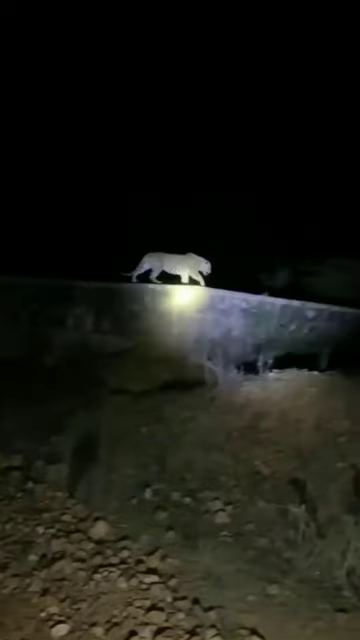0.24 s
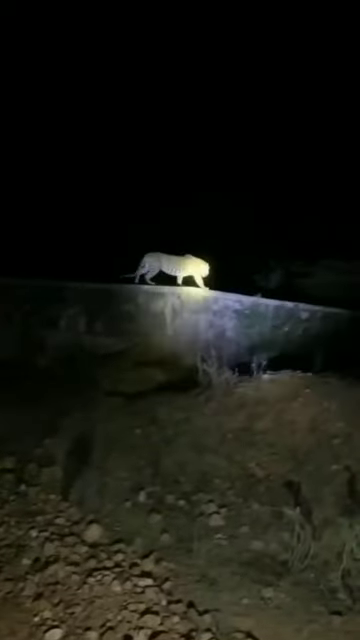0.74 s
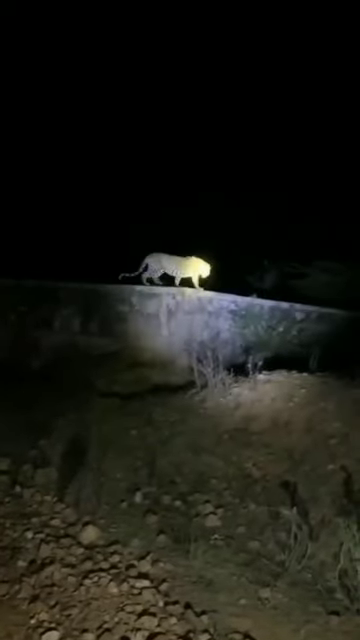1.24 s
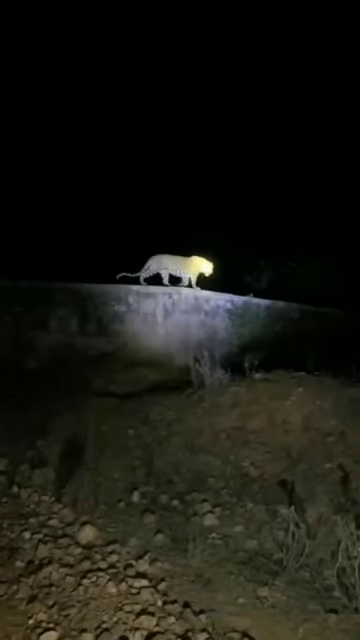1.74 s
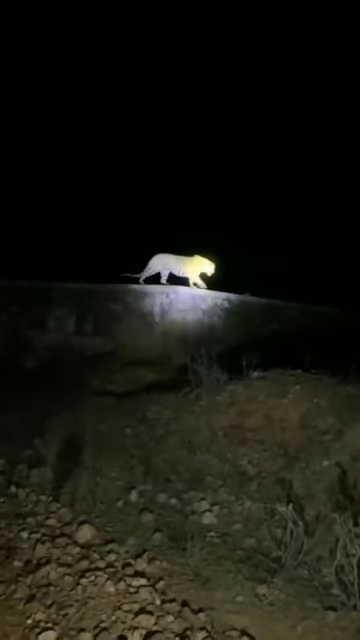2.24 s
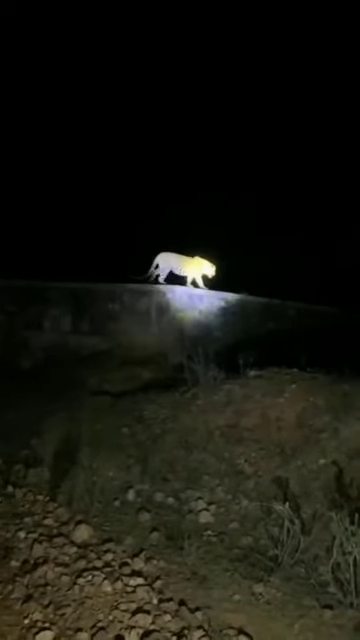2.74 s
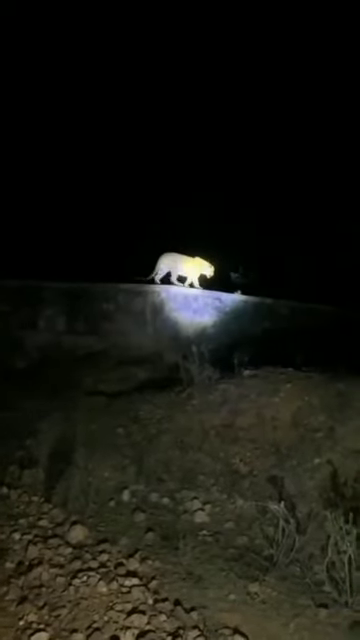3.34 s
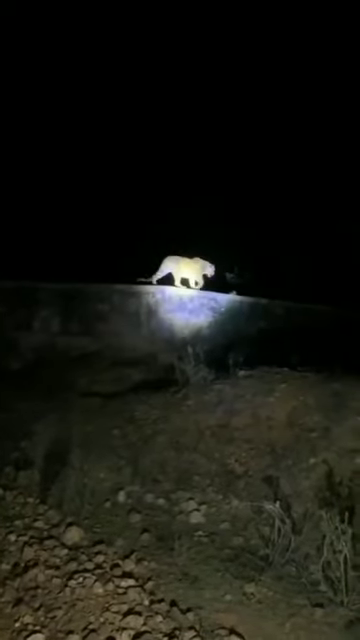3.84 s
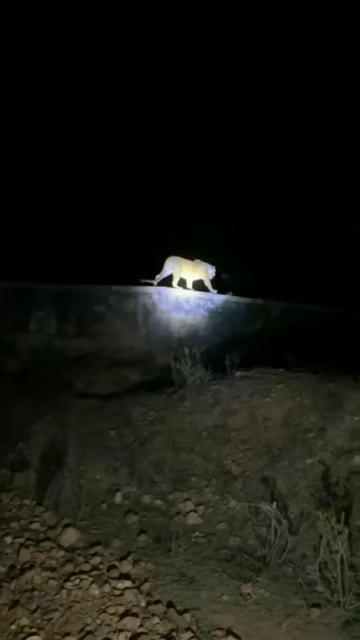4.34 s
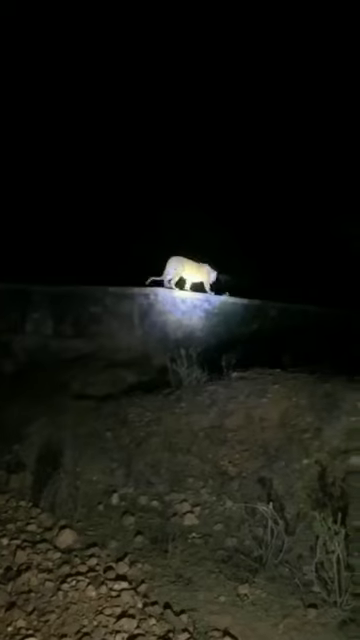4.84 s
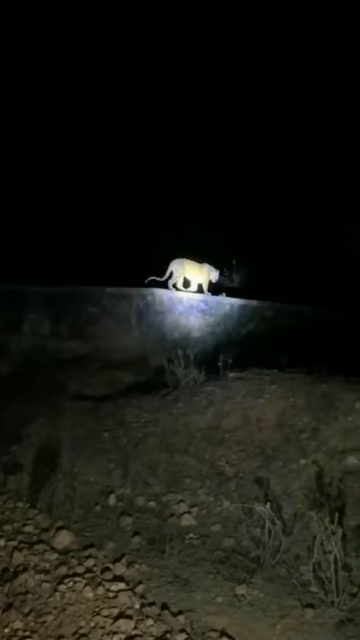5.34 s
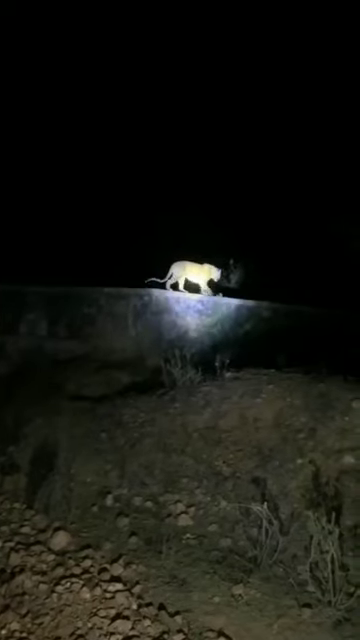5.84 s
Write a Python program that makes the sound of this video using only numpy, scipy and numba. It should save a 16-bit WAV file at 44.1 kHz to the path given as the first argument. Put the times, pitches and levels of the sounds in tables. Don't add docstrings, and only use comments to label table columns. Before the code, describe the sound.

A big cat lets a hoarse roar die away, then growls long and low, breathes in, grunts once and murmurs, outdoors at night.

```python
import sys
import numpy as np
from scipy import signal
from scipy.fft import rfft, irfft, next_fast_len
from scipy.io import wavfile
from scipy.ndimage import uniform_filter1d
from numba import njit

SR = 44100
rng = np.random.default_rng(int(sys.argv[2]) if len(sys.argv) > 2 else 0)


def generate_wav(signal):
    frames = np.transpose(np.atleast_2d(signal))
    scaled = np.clip(frames, -1, 1) * 32767
    pcm = np.round(scaled).astype(np.int16)
    wavfile.write(sys.argv[1], SR, pcm)


def voltage_ratio(level):
    return 10 ** (np.asarray(level, float) / 20)


N = 268153

WIDTHS_HZ = [37, 31.8, 27.36, 46.8, 28, 60.4, 100.8, 49.7]


def unit(x):
    return x / np.sqrt(np.mean(x ** 2) + 1e-20)


def along(points, hz):
    f, v = np.transpose(points)
    return np.interp(np.log(hz + 1), np.log(f + 1), v)


def curves(rows):
    s, *cols = np.transpose(rows)
    return np.array([np.interp(np.arange(N) / SR, s, c) for c in cols])


def bump(s, width_s):
    return np.exp(-((np.arange(N) / SR - s) / width_s) ** 2)


def box(x, s):
    return uniform_filter1d(x, size=round(s * SR))


def filtered(x, response):
    m = next_fast_len(N + SR // 2)
    return irfft(rfft(x, m) * response(np.fft.rfftfreq(m, 1 / SR)), m)[..., :N]


def sloped(x, lo_hz, hi_hz):
    return filtered(x, lambda f: 1 / (1 + lo_hz / (1j * f + 1e-9)) ** 2 / (1 + 1j * f / hi_hz) ** 2)


def resonated(x, c, w, times):
    return filtered(x, lambda f: (1j * f * w / (c * c - f * f + 1j * f * w)) ** times)


@njit
def ring(x, hz, width_hz, sr):
    y, state = np.zeros(len(x)), 0j
    for n in range(len(x)):
        loss = np.pi * width_hz[n] / sr
        state = state * np.exp(-loss + 2j * np.pi * hz[n] / sr) + loss * x[n]
        y[n] = 2 * state.imag
    return y


def patches(x, depth_db):
    z = signal.stft(x, nperseg=256)[2]
    field = uniform_filter1d(rng.standard_normal(z.shape), size=3, axis=0)
    field = uniform_filter1d(field, size=14, axis=1)
    return signal.istft(z * voltage_ratio(depth_db * unit(field)), nperseg=256)[1][:N]


def posture(table):
    # (time [s], posture [index])
    held = [(0, 11), (.17, 11), (.3, 0), (.78, 0), (.9, 10), (1.25, 6), (1.45, 1), (1.9, 1), (2.25, 2),
            (2.6, 2), (2.95, 7), (3.05, 7), (3.27, 3), (3.58, 3), (3.77, 4), (4.3, 4), (4.35, 0),
            (4.485, 0), (4.5, 5), (4.65, 5), (4.85, 8), (5.06, 8), (5.13, 9)]
    return curves([(s, *table[k]) for s, k in held])


def night():
    # (frequency [Hz], density [dB per Hz])
    rumble_spectrum = [(10, -17.5), (28, -2), (50, 0.5), (55, -3.5), (60, -17), (75, -16.5), (180, -26.5),
                       (260, -25.5), (450, -38), (760, -44), (1200, -47), (1600, -55), (3300, -65),
                       (6000, -60.5), (12000, -73.5)]
    return voltage_ratio(-50) * unit(filtered(rng.standard_normal(N), lambda f: voltage_ratio(along(rumble_spectrum, f))))


def pebbles():
    # (time [s], peak [dB], frequency [Hz], t60 [s], crunch share [0-1])
    ticks = [
        (1.339, -32.5, 844, 0.13, 0.8),
        (4.419, -42, 1360, 0.024, 0.4),
        (4.423, -62, 3100, .01, 0),
        (5.575, -64.5, 604, 0.21, 0.03),
        (5.67, -73, 1750, 0.028, .1),
        (5.715, -77, 1730, .03, .1),
        (5.765, -66, 1900, 0.026, .2),
        (5.89, -72.5, 2200, 0.034, .2),
        (5.915, -60, 1135, 0.085, 0.5),
    ]
    x, t = np.zeros(N + SR), np.arange(SR // 10) / SR
    dull = signal.butter(2, [250, 1500], "band", fs=SR, output="sos")
    for s, db, hz, t60, crunch in ticks:
        waver = uniform_filter1d(rng.standard_normal(len(t)), size=60)
        waver = uniform_filter1d(waver, size=20) * 5 + 1.6
        tone = waver * np.sin(2 * np.pi * hz * t)
        grit = unit(signal.sosfilt(dull, rng.standard_normal(len(t))))
        envelope = voltage_ratio(db - 1.0 - 60 * t / t60) * (1 - np.exp(-t / 0.0018))
        x[round(s * SR):][:len(t)] += envelope * ((1 - crunch) * tone + crunch * grit)
    return x[:N]


def wall(x):
    # (frequency [Hz], t60 [s])
    decay = [(100, 0.4), (1000, 0.51), (4000, 0.18)]
    hz, t, z = signal.stft(rng.standard_normal(SR // 2), SR, nperseg=256)
    tail = signal.istft(z * voltage_ratio(-60 * t / along(decay, hz)[:, None]), SR, nperseg=256)[1]
    return signal.fftconvolve(np.pad(x, (500, 0)), tail / np.linalg.norm(tail))[:N]


def folds(scatter_db, missed_db, hard_db):
    # (time [s], count)
    slap_counts = [
        [(.011, 0), (.26, 6), (.423, 10), (.569, 13), (.793, 18)],
        [(.893, 0), (1.241, 9), (1.699, 21), (2.102, 33), (2.506, 47), (2.675, 52), (2.833, 56), (2.951, 59),
         (2.992, 60), (3.033, 61), (3.365, 69), (3.704, 77)],
        [(4.502, 0), (4.636, 4), (4.71, 6), (4.756, 7), (4.79, 8), (4.918, 11), (4.974, 12), (5.009, 13),
         (5.106, 15)],
    ]
    hard_s = [.226, .26, .967, 1.044, 1.091, 1.241, 1.391, 1.427, 1.469, 1.545, 1.836, 1.969, 2.037, 2.102,
              2.331, 2.359, 2.538, 2.57, 2.638, 2.675, 2.751, 3.033, 3.2, 3.24, 3.615, 4.503, 4.533, 4.601,
              4.636, 4.709, 4.79, 4.834, 4.917]
    faint_s = [.3, .37, .47, .75, .893, .93, 1.01, 1.802, 1.353, 2.07, 2.604, 3.662, 4.876, 5.056, 5.106]
    flutter_s = [
        3.22,
        3.262,
        3.303,
        3.345,
        3.385,
    ]

    calls = []
    for rows in slap_counts:
        times, counts = np.transpose(rows)
        calls.append(np.interp(np.arange(rows[-1][1] + 1), counts, times))
    at = np.hstack(calls)

    def nearest(times):
        return np.abs(at[:, None] - times).argmin(axis=0)

    size_db = scatter_db * rng.standard_normal(len(at))
    limp = np.flatnonzero((at > 2.2) & (at < 2.49))
    size_db[limp] += np.resize([missed_db, hard_db, hard_db], len(limp))
    size_db[nearest(faint_s)] += missed_db
    size_db[nearest(hard_s)] += hard_db
    at[nearest(hard_s)] = hard_s
    x = np.zeros(N)
    x[np.round(np.array(flutter_s) * SR).astype(int)] = voltage_ratio(missed_db)
    x[np.round(at * SR).astype(int)] = voltage_ratio(size_db)
    return unit(x) * 1.1


def accented(slaps):
    # (time [s], mouth gain [dB], rasp gain [dB])
    accents = [(.011, -7.5, -4.5), (.052, -7.5, -4), (.094, -6.5, -4.5), (.135, -6, -4.5), (1.836, 3.5, 2),
               (2.751, 2.5, 0.5), (2.912, -4, -5.5), (3.075, -5, -4), (4.79, -0.5, -2.5),
               (.423, -5.5, -6.5), (1.204, -8.5, -12.5), (1.427, -3, -13.5), (1.469, 2, 0), (1.545, 3, -2),
               (1.7, -7.5, -9), (2.037, 1.5, 10), (2.102, -4.5, -2.5), (2.135, -7.5, 4), (2.22, -3, -12.5),
               (2.247, -2, 6.5), (2.275, -4.5, 1), (2.331, -5, 0.5), (2.359, -6, 1.5), (2.39, -12, -3.5),
               (2.42, -4.5, -1.5), (2.447, -0.5, 4.5), (2.506, -1.5, -3), (2.538, 1.5, -14.5), (2.57, 2, 2),
               (2.604, -8, 0.5), (2.638, 1, -9), (2.675, 4, -1.5), (2.711, 6.5, 4), (2.833, 0.5, -3),
               (2.873, -9, -9), (2.992, -4.5, -9), (3.033, -0.5, 2), (3.24, -5, -7), (3.615, -0.5, -13),
               (4.503, -3, -8), (4.533, -2, 2), (4.568, -3.5, 6), (4.601, -0.5, 3.5), (4.636, 4, 6),
               (4.674, -6.5, 3), (4.709, -3.5, -7), (4.756, -1.5, 2.5), (4.834, 8, 4.5), (4.876, 2.5, -5.5),
               (4.917, 1.5, -0.5), (4.974, 3, 4), (5.009, -2, -10.5), (5.056, 5.5, 7)]
    s, *gains_db = np.transpose(accents)
    hit = np.flatnonzero(slaps)
    accent_db = np.zeros((2, N))
    accent_db[:, hit[np.abs(hit[:, None] / SR - s).argmin(axis=0)]] = gains_db
    return slaps * voltage_ratio(accent_db)


def each_slap(slaps):
    return rng.standard_normal(N)[np.cumsum(slaps > 0)]


def puff(slaps, t60_s):
    return np.abs(signal.fftconvolve(slaps, voltage_ratio(-60 * np.arange(SR // 20) / SR / t60_s))[:N])


def gated(steady, burst):
    return unit(steady + burst / np.mean(burst)) * rng.standard_normal(N)


def drive(slaps, puffs, share, more_air, vary_db, steady):
    air = np.clip(share + more_air, 0, 1)
    struck = slaps * voltage_ratio(vary_db * rng.standard_normal(N))
    return np.sqrt(1 - air) * struck + np.sqrt(air) * gated(steady, puffs)


def throat_hz(drop):
    # (eight resonances, lowest first [Hz])
    shapes = [(144, 345, 519, 822, 950, 1163, 1300, 1600), (122.7, 340, 572.5, 770, 1015, 1270, 1452, 1610),
              (139, 350, 532, 895, 1080, 1325, 1316, 1558), (128, 360, 532, 830, 1100, 1100, 1300, 1660),
              (204, 325, 570, 812, 1300, 980, 1200, 2300), (128, 315, 488, 660, 953, 1130, 1290, 1560),
              (120, 355, 545, 550, 1040, 1100, 1360, 1400), (122, 357, 521, 1100, 1005, 1290, 1460, 1568),
              (130, 310, 484, 1000, 953, 1102, 1275, 1570), (122.5, 320, 430, 670, 1000, 950, 1290, 990),
              (125, 310, 525, 600, 915, 820, 1260, 1520), (142.1, 358, 527, 850, 940, 1170, 1320, 1600)]
    wander, turns_per_s = .016, 9
    hz = posture(shapes)
    knots = rng.standard_normal((len(hz), int(N / SR * turns_per_s) + 2))
    knot_s = np.arange(knots.shape[1]) / turns_per_s
    hz *= np.exp(wander * curves(np.c_[knot_s, knots.T]))
    hz[0] *= 1 - 0.12 * drop
    return hz


def mode(x, k, hz, damping):
    width_hz = WIDTHS_HZ[k] * damping
    return ring(x, hz[k], width_hz, SR) / np.sqrt(width_hz)


def deep_drive(slaps, puffs, share):
    # (time [s], level [dB])
    surges = [(.08, 0.5), (.24, -2.5), (.43, -1.5), (.55, -3), (1.52, 0), (2.14, -4.5), (2.225, 3),
              (2.365, -6), (2.45, 2), (2.53, 0.5), (2.69, -1.5), (4.72, 1.5)]
    even = 1.1 * unit(slaps ** .5)
    low = np.roll(drive(even, puffs, share, .08, 1, 2), 90)
    return low * voltage_ratio(sum(db * bump(s, .025) for s, db in surges))


def chest(low, slaps, share, hz, damping):
    # (time [s], gain [dB])
    heaves = [
        (0.799, -3.5),
        (1.2, 13),
        (1.6, 19.5),
        (1.98, 23),
        (2.77, 19.5),
        (3.1, 7.5),
        (4.721, 33),
        (5.1, 26),
    ]
    open_damps_hz, open_s = 55, .008
    parted = open_damps_hz * np.roll(box(1. * (slaps > 0), open_s), -60) * open_s * SR
    boom = ring(low, hz[0], WIDTHS_HZ[0] * damping + parted, SR) / np.sqrt(damping)
    boom = ring(boom, hz[0], 70 * damping + parted, SR)
    ribs_db = np.minimum(-61.5 + 66 * share, -6)
    belly_db = -28 + sum(db * bump(s, 0.06) for s, db in heaves)
    ribs = unit(resonated(low, 245, 130, 2))
    belly = unit(resonated(low, 65, 9.7, 2))
    return unit(sloped(boom, 120, 250)) + voltage_ratio(ribs_db) * ribs + voltage_ratio(belly_db) * belly


def throat(low, hz, damping, lips_db):
    return sloped(mode(low, 1, hz, damping) - voltage_ratio(lips_db) * mode(low, 2, hz, damping), 240, 1300)


def crack(mouthed, slaps):
    # (time [s], frequency [Hz])
    snap = [(.3, 1385), (.9, 1230), (.97, 1310), (1.09, 1540), (1.2, 1620), (1.75, 1593), (1.85, 1350),
            (2.1, 1380), (2.25, 1285), (2.45, 1312), (2.65, 1385), (2.85, 1384), (3.0, 1420), (3.6, 1572),
            (4.5, 1183), (4.6, 1270), (4.83, 1279), (5.1, 1249)]
    snap_hz = curves(snap)[0] * np.exp(.02 * each_slap(slaps))
    width_hz = 230 * np.ones(N)
    return unit(ring(ring(mouthed, snap_hz, width_hz, SR), snap_hz, width_hz, SR))


def mouth(low, mouthed, slaps, puffs, share, strain, hz, damping, nasal_db, tilt_db):
    strengths_db = [-1.5, -0.5, -4, -5]
    y = 0
    for k in range(4, 8):
        gain = voltage_ratio(strengths_db[k - 4] + tilt_db * (k - 4))
        y = y + (-1) ** k * gain * mode(drive(mouthed, puffs, share, -.06, 2, 1.2), k, hz, damping)
    y = unit(sloped(y - voltage_ratio(nasal_db) * mode(low, 3, hz, damping), 400, 6000))
    crack_db = -0.5 - 11 * share + 7.5 * strain
    cheek_db = -9.5 + 0.73 * nasal_db
    y = y + voltage_ratio(crack_db) * crack(mouthed, slaps) + voltage_ratio(cheek_db) * unit(resonated(low, 695, 140, 2))
    hush_db, hush_s = 5.5, 0.013
    hush = box(1. * (slaps > 0), hush_s) * hush_s * SR
    hush = box(np.roll(hush, -round((hush_s / 2 + .0015) * SR)), .003)
    return y * voltage_ratio(-hush_db * (1 - share) * hush)


def rasp(bitten, slaps, puffs, share, hiss_db):
    jaw = [(-7, -1, -3, -3, -13), (12.5, -7, 6, -6, -19.5), (-2, -1.5, -8, -10, -12.5),
           (-22, -24, 6.5, -12, -26), (-5.5, -4.5, 7, -10, -10), (3.5, 8.5, 7, -13, -10.5),
           (4.5, -8, -11, -21, -11), (3, -7.5, 2.5, -11, -27), (11.5, 14, 1, -7.5, -10.5),
           (-14, -18, -22, -25, -25), (-6, -15, -12, -15, -14), (-8, -4, -5.5, -4, -12.5)]
    teeth = [(2100, 3700, 2900, 2300, 4800), (2130, 3700, 2930, 3220, 3100), (2060, 2580, 2860, 2900, 4100),
             (2303, 2580, 2950, 2300, 3900), (2082, 2580, 2860, 3200, 4500), (2100, 2480, 2830, 4200, 4500),
             (2134, 3100, 3200, 2500, 4300), (2083, 3300, 2900, 2400, 4700), (1900, 2540, 3050, 4090, 4900),
             (1847, 2100, 2600, 3200, 4400), (2113, 2580, 3400, 2500, 4300), (2100, 2300, 3300, 2300, 4800)]
    rasp_widths = [258, 300, 190, 140, 609]
    # (frequency [Hz], density [dB per Hz])
    hiss_spectrum = [(1500, -11.5), (2000, -1.5), (3000, -7.5), (4000, -13), (5000, -18), (6500, -20.5),
                     (8200, -20.5), (9300, -38), (11000, -44.5), (12800, -47), (13500, -100)]
    y = 0
    for db, c, w in zip(posture(jaw), posture(teeth), rasp_widths):
        x = voltage_ratio(2 * each_slap(slaps)) * drive(bitten, puffs, share, -.02, 1, .25)
        x = np.diff(x, prepend=0)
        c = c * np.exp(.03 * each_slap(slaps))
        for width_hz in (w, w, 2 * w):
            x = ring(x, c, width_hz * np.ones(N), SR)
        y = y + voltage_ratio(db) * unit(x)
    spits = uniform_filter1d(puff(slaps, 0.0877), size=400)
    hiss = patches(gated(1 + 5 * share ** 3, spits), depth_db=4)
    return y + voltage_ratio(hiss_db + 7.0) * unit(filtered(hiss, lambda f: voltage_ratio(along(hiss_spectrum, f))))


def side_pockets(pipe):
    # (centre [Hz], width [Hz])
    traps = [(810, 250), (244, 69)]
    pockets = [(0.11, 0.15), (0, 0.27), (0.1, 0.57), (0.47, 1), (0.11, .5), (0.48, 0), (0.0084, 0.066),
               (0.12, 1), (0.94, 0), (0.88, 0), (.3, .2), (0.2, 0.059)]
    for (c, w), share_lost in zip(traps, np.clip(posture(pockets), 0, 1)):
        pipe = pipe - share_lost * resonated(pipe, c, w, 1)
    return pipe


def gestures():
    # (time [s], effort [dB], larynx drop [0-1], mouth opening [0-1], air share [0-1])
    roar = [
        (0, -23, 0.9, 0.72, 0.94),
        (.04, -16, 0.32, 0.4, 0.87),
        (.137, -19.5, 0.53, 0.53, 0.85),
        (.365, -28, 0.43, 0.44, .83),
        (.455, -28.5, 0.62, 0.65, 0.75),
        (.579, -32, 0.3, 0.31, 0.9),
        (.635, -39.5, 0.51, 0.44, 0.64),
        (.85, -46, 0.3, 0.52, 0.86),
    ]
    rumble = [
        (.88, -42, 0.65, 1, 0.45),
        (.978, -45, 0.63, 0.75, 0.33),
        (1.034, -50.5, 0.71, 0.83, .3),
        (1.331, -43.5, 0.72, 0.61, 0.36),
        (1.39, -43, .8, 0.69, 0.49),
        (1.556, -29.5, 0.5, 0.39, 0.81),
        (1.704, -36.5, 0.46, 0.52, 0.65),
    ]
    growl = [
        (1.984, -25.5, 0.39, 0.67, 0.67),
        (2.06, -19.5, .02, 0.54, 0.79),
        (2.2, -16, 0.16, 0.5, 0.6),
        (2.479, -22, 0.39, 0.61, 0.36),
        (2.77, -24, 0.22, 0.49, 0.64),
        (2.93, -38.5, .4, 0.66, 0.25),
        (3.0, -35.5, 0.43, 0.64, 0.44),
        (3.15, -44.5, 0.43, 0.49, 0.38),
        (3.36, -42.5, 0.49, 0.27, .22),
    ]
    fade = [
        (3.586, -47.5, 0.35, 0.27, 0.39),
        (3.674, -56, 0.92, 0.49, .29),
        (3.737, -61.5, 0.73, 0.15, 0.5),
        (3.8, -69.5, 1.3, 0.48, .65),
        (3.946, -82, 1.25, 0.66, .72),
        (4.014, -62, 1.2, .2, 0.56),
        (4.256, -80, .77, .64, .9),
        (4.304, -89, 0.303, 0.69, 0.79),
    ]
    inhale = [
        (4.35, -41.5, -.3, 0.019, 1),
        (4.386, -47, .55, 0.56, 0.99),
        (4.49, -45, .45, 0.43, 0.99),
    ]
    grunt = [
        (4.5, -38.5, 0.25, 0.97, 0.11),
        (4.545, -31, 0.23, 0.9, .18),
        (4.613, -26.5, 0.12, 0.89, 0.58),
        (4.882, -31.5, 0.34, 0.57, 0.66),
        (4.984, -34.5, 0.4, 0.76, 0.58),
        (5.08, -43.5, 0.3, 0.82, .45),
        (5.15, -54.5, 0.5, 0.7, 0.64),
        (5.246, -60, .7, 0.86, .8),
        (5.33, -75, 0.55, 0.9, .85),
        (5.4, -74, 0.65, 0.26, 0.71),
    ]
    murmur = [
        (5.45, -77, .2, .1, .86),
        (5.546, -64, 0.36, -.1, .86),
        (5.736, -68.5, 0.31, 0.089, .86),
        (5.864, -85.5, 0.35, .2, .86),
        (5.908, -66, -.1, 0.84, .86),
        (6.06, -82.5, 0.5, 0.15, .86),
    ]
    return curves(roar + rumble + growl + fade + inhale + grunt + murmur)


def cat():
    # (time [s], tension [0-1])
    tension = [(0, 0.46), (.25, 0.38), (.55, 0.54), (.95, 0.5), (1.3, 0.82), (1.6, 0.63), (1.95, 0.34),
               (2.3, 0.61), (2.45, 0.72), (2.65, 0.45), (2.95, .6), (3.5, 0.6), (4.3, 0.3), (4.5, 0.2),
               (4.6, 0.28), (4.8, 0.49), (5.05, 0.4), (5.12, 0.4), (6.0, .5)]
    # (damping factor, nasal [dB], mouth tilt per resonance [dB],
    # third resonance against second [dB], hiss [dB])
    colours = [(1.3, 6, -1, 2.5, 5.5), (1.3, 0.5, 0, -2.5, 3.5), (0.95, -0.5, -0.5, -5, 5.5),
               (0.62, -15.5, 2.5, -6, 4), (1.5, -3.5, -1, -8.5, 29), (0.8, -14.5, -3.5, -4, -1),
               (0.72, -8.5, 1, -6, 3.5), (0.86, -3.5, -0.5, -3, -4.5), (.8, -21, -2, -6, 2),
               (0.5, -22, 1, 1.5, -11), (0.88, -9, -2, -1, 3.5), (1.2, 6, -0.5, 7, 7)]
    effort_db, drop, opening, share = gestures()
    strain = curves(tension)[0] - .5
    damping, nasal_db, tilt_db, lips_db, hiss_db = posture(colours)
    hz = throat_hz(drop)

    chest_db = effort_db - 9.5 + 27.5 * drop
    throat_db = effort_db + 19.5 * bump(1.346, 0.0055)
    mouth_db = throat_db - 20 + 25 * opening
    rasp_db = mouth_db - 19.5 + 28 * strain + 0.088 * (throat_db - throat_db.max())

    slaps = folds(scatter_db=1.5, missed_db=-8, hard_db=3)
    puffs = puff(slaps, 0.2)
    mouthed, bitten = accented(slaps)
    low = deep_drive(slaps, puffs, share)
    deep = chest(low, slaps, share, hz, damping)
    middle = throat(low, hz, damping, lips_db)
    upper = mouth(low, mouthed, slaps, puffs, share, strain, hz, damping, nasal_db, tilt_db)
    edge = signal.butter(9, 1760, fs=SR, output="sos")
    pipe = voltage_ratio(throat_db) * unit(signal.sosfilt(edge, middle))
    pipe = pipe + voltage_ratio(mouth_db) * unit(signal.sosfilt(edge, upper))
    rough = voltage_ratio(rasp_db - 9.5) * rasp(bitten, slaps, puffs, share, hiss_db)
    return voltage_ratio(chest_db) * deep + side_pockets(pipe) + rough


def opening_click():
    t = np.arange(N) / SR
    return voltage_ratio(-9 - 60 * t / 0.036) * np.cos(2 * np.pi * 519 * t)


def scene():
    voice = cat() + opening_click()
    mono = voltage_ratio(-1) * voice + voltage_ratio(-11) * wall(voice) + pebbles() + night()
    mono = mono / (1 + np.abs(mono / .8) ** 6) ** (1 / 6)
    return mono * voltage_ratio([[-2.54], [1.96]])


def top_cut(x):
    return signal.sosfilt(signal.butter(12, 13000, fs=SR, output="sos"), x)


def record(dry):
    hiss = filtered(rng.standard_normal(dry.shape), lambda f: 1 / (1 + 1j * f / 4000))
    return top_cut(voltage_ratio(-88) * unit(hiss) + dry)


dry = scene()
out = record(dry)
generate_wav(out)
```